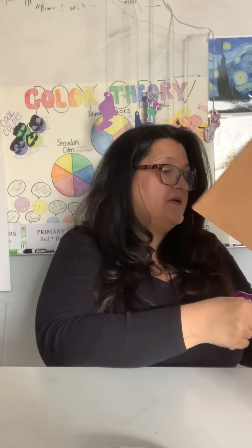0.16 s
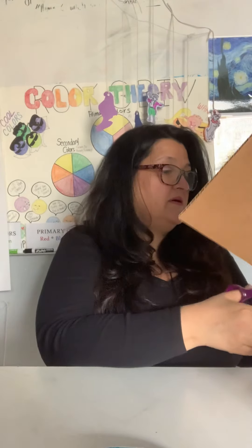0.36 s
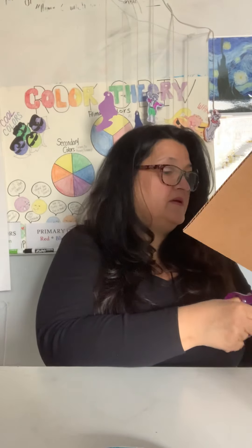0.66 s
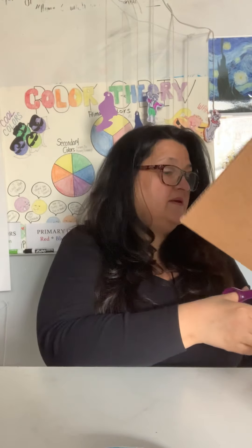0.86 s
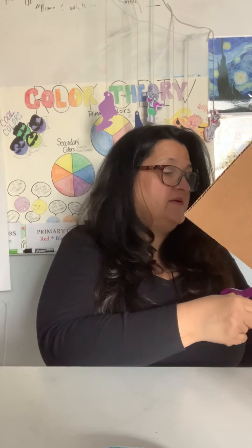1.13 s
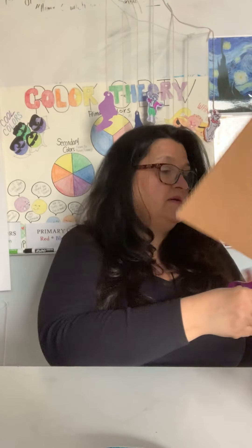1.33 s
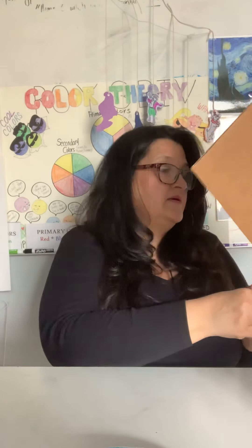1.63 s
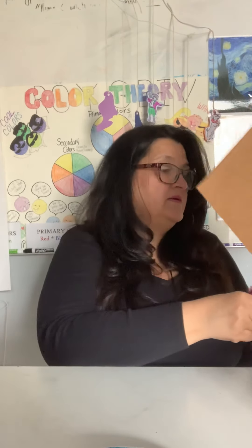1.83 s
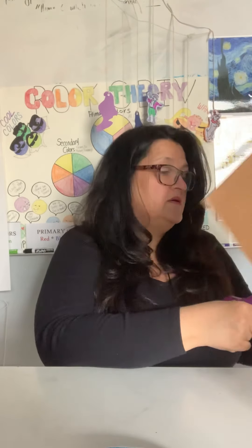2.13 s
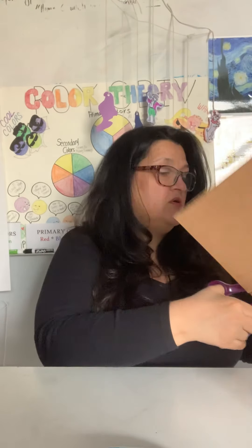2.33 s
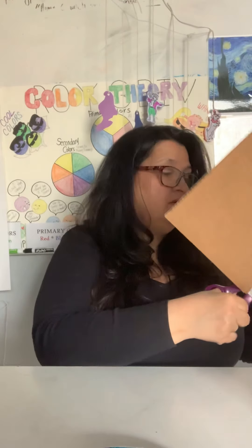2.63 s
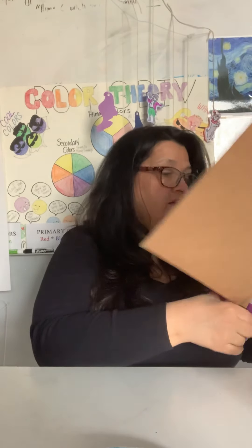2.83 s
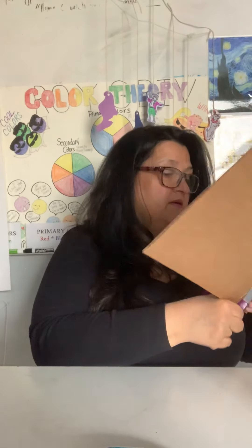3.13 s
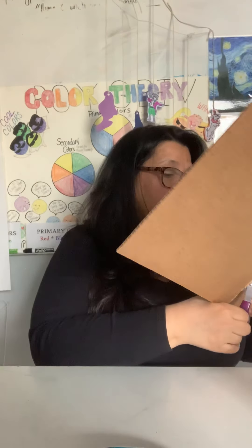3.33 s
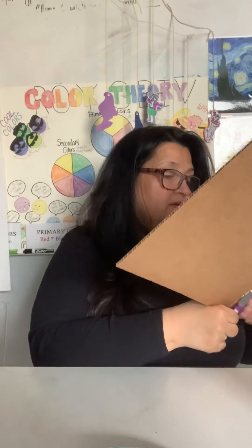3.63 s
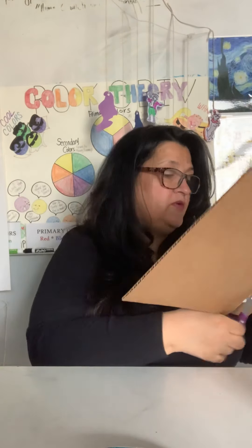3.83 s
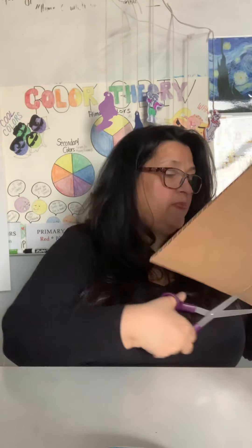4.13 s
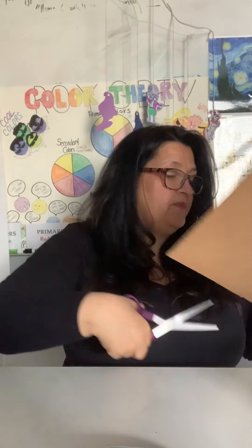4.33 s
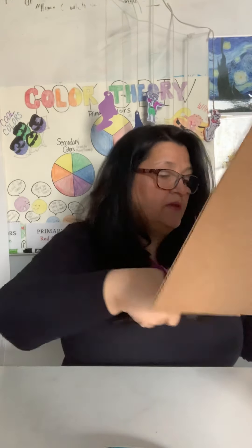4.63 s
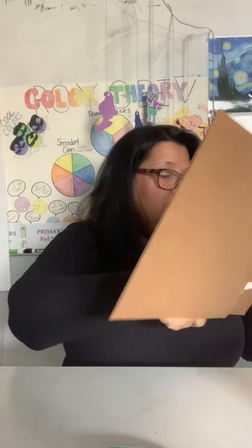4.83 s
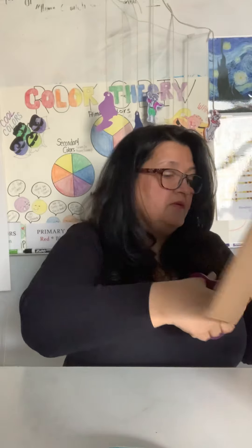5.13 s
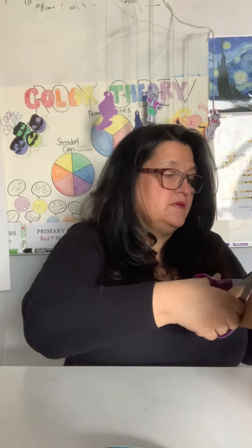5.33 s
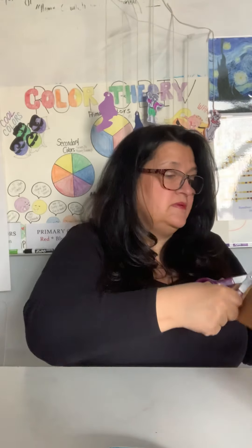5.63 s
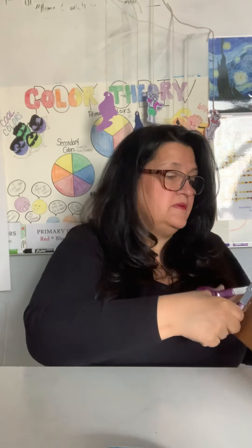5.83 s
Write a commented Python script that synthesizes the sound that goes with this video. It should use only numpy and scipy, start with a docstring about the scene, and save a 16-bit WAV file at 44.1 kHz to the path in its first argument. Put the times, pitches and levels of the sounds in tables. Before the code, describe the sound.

Scissors cut in irregular crunching snips through a stiff cardboard sheet that knocks and pops hollowly, close by in a small quiet room.

```python
"""Scissors through cardboard

Scissors cut a hand-held sheet of cardboard at a table, right of a stereo microphone in a small room.
Strokes are noise grains and fibre twangs, coloured into hiss, rasp and drumming; snaps are bursts of breaks.
The sheet knocks in decaying bending modes and pops in short sinking notes.
Behind them: a rumble as the sheet is moved, a faint gliding tone and quiet room air."""
import sys
import numpy as np
from scipy import signal
from scipy.fft import rfft, irfft, next_fast_len
from scipy.io import wavfile
from scipy.ndimage import uniform_filter1d, map_coordinates

SR = 44100
rng = np.random.default_rng(int(sys.argv[2]) if len(sys.argv) > 2 else 0)


def materialize(psi):
    """Save the field psi as 16-bit PCM at rate SR to the path in sys.argv[1].

    A 1-D psi becomes a single channel; in a 2-D psi each row is a channel.
    """
    bounded = np.clip(np.atleast_2d(psi).T, -1, 1)
    quanta = np.round(bounded * 32767).astype(np.int16)
    wavfile.write(sys.argv[1], SR, quanta)


N = 263894  # samples

# room air spectrum: freq_hz, level_db
AIR_SPECTRUM = [(25, -6.5), (60, 1), (130, -0.5), (200, -3), (300, -13.5), (600, -23), (1200, -29),
                (1700, -17), (4000, -34.5), (5400, -29), (11000, -33.5), (16000, -46.5)]
# rumble spectrum: freq_hz, level_db
RUMBLE_SPECTRUM = [(20, -4), (32, -9), (45, 0), (72, -3), (120, -4), (200, -13.5), (400, -45), (2000, -95)]
# rumble level as the sheet is moved about: time_s, level_db
SWAY_LEVEL = [(0, -63.5), (1.1, -62), (1.4, -68.5), (1.9, -65), (2.2, -63), (3.6, -64), (4.1, -59.5),
              (4.45, -79), (4.85, -62), (5.1, -97), (5.5, -103), (5.72, -62), (5.98, -80)]
# faint tone while the sheet is turned: time_s, pitch_hz, level_db
GLIDE = [(4.32, 245, -95), (4.37, 242, -64), (4.42, 248, -63), (4.46, 262, -69), (4.5, 275, -61),
         (4.56, 268, -69), (4.62, 268, -95)]
# decay of the room: freq_hz, t60_s
ROOM_T60 = [(150, 0.43), (400, 0.1), (1000, 0.14), (3000, 0.062), (7500, 0.2), (15000, 0.23)]
# likeness of the two microphone ports: freq_hz, coherence (0-1)
PORT_LIKENESS = [(60, .99), (300, .98), (600, .91), (1200, .8), (2200, .68), (4400, .9), (8500, .9),
                 (13000, .9)]
# lag of the left port behind the right: freq_hz, lag_s
PORT_LAG = [(200, .00009), (700, .00017), (1500, .00013), (4400, .000116), (13000, .000114)]

# bending modes of the sheet: pitch_hz, level_db, t60_s (before the ring factor)
SHEET_MODES = [(76, -6, 0.27), (195.5, -5, 0.3), (284, 5.5, 0.26), (360.5, -0.5, 0.21), (413.4, -0.5, 0.21),
               (508, -9.5, 0.15), (540.6, -4, 0.14), (606.5, 3.5, 0.09), (691, 3, 0.11), (749, -11, 0.24),
               (917, -7, 0.17), (1051, -1, 0.1), (1244, -3.5, 0.1), (1515, 1, 0.087), (1970, 1, 0.095),
               (2545, 0, 0.18)]
# decay of the finer sheet modes: freq_hz, t60_s
FINE_MODE_T60 = [(100, 0.19), (300, 0.19), (800, 0.081), (3000, 0.043)]
# mode families thump, boom, body, clack: low_hz, high_hz
MODE_FAMILIES = [(45, 240), (240, 470), (470, 1000), (1000, 3000)]
# gain of the fine modes, one per family: gain_db
FINE_GAIN_DB = [-1, -15, -8, 3.5]
# boom pitch set by the grip on the sheet: time_s, pitch_hz
GRIP_PITCH = [(0.1, 282), (1.0, 295), (1.6, 290), (3.0, 302), (3.5, 312), (4.2, 278.3), (4.48, 269),
              (4.66, 279.4), (5.6, 276.3)]
# buckling knocks: start_s, level_db, thump_db, boom_db, clack_db (all three re body), ring_factor
KNOCKS = [(0.006,-35,6.5,-2,-9,.8), (0.047,-36.5,1,-5,0.5,0.5), (0.076,-36,-5,2.5,-2,0.34),
          (0.139,-38,8,-1,-1,0.69), (0.538,-32,0,5,7.5,0.57), (0.565,-24,-3.5,1,-3.5,0.89),
          (0.594,-30.5,5,4,1.5,0.76), (1.002,-24,-6.5,-7,-1.5,0.67), (1.02,-28,3,-6.5,-1,0.99),
          (1.052,-30.5,-13.5,-14,4,1.3), (1.595,-16,-10.5,-1,-4,0.88), (1.686,-27,-6,-1.5,-3.5,0.93),
          (2.081,-31,-8,-26,-6,0.91), (2.278,-25.5,-3,-7.5,-2.5,1.45), (2.479,-28,-4.5,-10,-3.5,0.76),
          (2.572,-20,-7.5,-10,-3,0.98), (2.967,-20.5,-1.5,5,3.5,1.24), (3.02,-21,-12,-8,-11,1.2),
          (3.042,-23,-7,-1,-5.5,0.65), (3.265,-22.5,-14.5,-8,1.5,1.2), (3.422,-24,-6,11,1,0.7),
          (3.445,-24,-7,-6,-15,0.52), (3.533,-19.5,-13,2.5,-10,0.44), (3.737,-23,-22.5,-9.5,-10.5,1),
          (3.853,-29,-15,1.5,-3.5,.95), (4.195,-24.5,-9,0,3.5,0.92), (4.481,-58,4.5,2,4.5,1.2),
          (4.626,-23,-2,1,-4,1.1), (4.659,-27.5,-6,9.5,11,0.6), (4.766,-26.5,-3,1,-3.5,2.4),
          (4.871,-28.5,-10,2,2,2.3), (5.009,-31,-21,1.5,2.5,0.78), (5.048,-25.5,-29,-12,7,.55),
          (5.124,-22,-15.5,-5,3.5,0.97), (5.415,-34,-25,-8,-20,1.3), (5.485,-20.5,-20,0,-6,1.14),
          (5.552,-23,-14,5,-4,1.6), (5.569,-24.5,-11,2,-9,.8), (5.594,-16,-16,1,-3,0.78),
          (5.713,-30,6,9,-10,0.73), (5.78,-30,-2.5,-16,4,0.85)]
# patches popping through: start_s, pitch_hz (at onset), level_db, t60_s
POPS = [(0.006, 425, -25.5, 0.041), (0.047, 402, -22, 0.034), (0.044, 1070, -36, 0.046),
        (0.078, 183, -31, 0.11), (0.14, 640, -37.5, 0.064), (0.566, 539, -23, 0.063),
        (1.002, 1010, -27, 0.042), (1.256, 2010, -37, 0.065), (1.596, 615, -21.5, .08),
        (1.597, 441, -27.5, 0.17), (1.686, 686, -31, 0.053), (1.687, 2320, -36, .08),
        (2.479, 1200, -19.5, 0.017), (2.57, 890, -27.5, 0.034), (2.969, 1280, -21.5, 0.052),
        (3.02, 584, -19.5, 0.076), (3.043, 608, -21.5, 0.072), (3.045, 296, -23, 0.16),
        (3.266, 1250, -27.5, .03), (3.422, 601, -18.5, 0.094), (3.445, 1050, -28, .03),
        (3.533, 644, -15.5, 0.05), (3.534, 962, -22.5, 0.074), (3.739, 617, -29.5, 0.056),
        (3.995, 1010, -38, 0.028), (4.016, 392, -34, 0.058), (4.229, 980, -31, .06),
        (4.626, 400, -27.5, 0.084), (4.659, 1470, -27, .04), (4.66, 615, -31, .09),
        (5.009, 1363, -25, 0.037), (5.4815, 1476, -20.5, 0.032), (5.552, 767, -19, 0.037),
        (5.554, 361, -22, 0.12), (5.588, 1490, -15.5, 0.03), (5.592, 685, -14.5, .045),
        (5.603, 279, -18, 0.16), (5.492, 285, -23.5, 0.17), (5.126, 292, -29.5, 0.094)]

# board giving way: start_s, level_db, decay_s (60 dB, floored at 2 ms), woody_db (middle of the crack)
SNAPS = [(0.004, -25, 0.023, -5), (0.045, -21, 0.02, -5), (0.0768, -20.5, 0.018, -4),
         (0.102, -27, .007, -9), (0.115, -24, 0.0091, -20), (0.1387, -9, 0.0047, -9.5),
         (0.2726, -24.5, 0.0077, 3), (0.528, -21, 0.0077, 4), (0.5367, -15.5, 0.022, 2),
         (0.5414, -16.5, .022, 1), (0.5654, -12.5, 0.015, -8), (0.5924, -15.5, 0.021, -13),
         (0.7445, -24.5, 0.01, -2), (0.7805, -5.5, .0012, -5.5), (0.788, -12.5, 0.0028, 1),
         (0.961, -24.5, 0.017, -2), (1.0022, -15, .018, 2.5), (1.018, -18, 0.018, -9),
         (1.052, -20.5, 0.028, 4), (1.5926, -21, 0.0071, 2), (1.5948, -14, .013, 3),
         (1.683, -26.5, 0.026, 5), (1.691, -28.5, .015, -12), (1.743, -39.5, 0.0099, -4),
         (1.9068, -61.5, .011, -6.5), (2.143, -32.5, 0.0099, 1), (2.4224, -36.5, 0.0078, 12),
         (2.479, -29, .0059, 9), (2.54, -15.5, 0.0092, 3), (2.5698, -14, 0.012, 1),
         (2.577, -25.5, 0.045, 1), (2.822, -22, 0.0042, -7), (2.907, -31, 0.0078, 2),
         (2.9667, -16, 0.011, -2), (2.9705, -13.5, 0.01, 5), (2.975, -17, .023, 5), (3.0173, -20, 0.011, 0),
         (3.1785, -34, .005, -9), (3.266, -23, 0.0095, 12), (3.4207, -14, 0.0073, 7),
         (3.533, -27.5, .012, 9), (3.7378, -47, .008, 0), (3.773, -23.5, 0.01, 8),
         (4.1949, -14.5, 0.0078, -5), (4.228, -15.5, 0.0082, -2), (4.446, -50, 0.042, 6),
         (4.501, -47, 0.035, 0.5), (4.6237, -27.5, 0.015, 2.5), (4.632, -25, 0.0054, -2),
         (4.6588, -5, 0.0059, -3), (4.743, -22, 0.0037, -3), (4.82, -36, 0.0037, -1),
         (5.0472, 0.5, 0.0035, -0.5), (5.07, -14, 0.011, -6), (5.1224, -8, 0.0024, 9),
         (5.2842, -32.5, 0.0039, -12), (5.411, -25.5, 0.0087, -5), (5.4148, -18, .0024, -9),
         (5.43, -20, 0.0045, -10), (5.445, -26, 0.0036, -15), (5.459, -29, .003, -10),
         (5.4816, -7, 0.01, -8), (5.4865, -14, .018, -19), (5.501, -26, 0.035, -5),
         (5.551, -20, 0.0059, -3), (5.571, -19, 0.016, -12), (5.588, -15.5, 0.013, 12),
         (5.5915, -7, 0.021, 4.5), (5.866, -18, 0.0043, -5)]
# crack spectrum: freq_hz, level_db
CRACK_SPECTRUM = [(150, -20.5), (700, -8.5), (1300, -13.5), (2200, -13), (3300, 1), (4400, -23.5),
                  (5500, 2.5), (6700, 2), (9500, 1), (11000, 0.5), (13500, -10.5), (16000, -2)]
# resonance of the strip between the blades: time_s, pitch_hz
STRIP_PITCH = [(0.14, 9700), (0.59, 9300), (0.78, 8100), (1.0, 9100), (2.55, 7800), (2.97, 8500),
               (4.66, 7320), (5.05, 8820), (5.48, 7200), (5.59, 6570)]
# rate of small snaps within strokes: time_s, ticks_per_s
TICK_RATE = [(0, 70), (1.0, 55), (1.3, 10), (2.2, 20), (2.5, 55), (3.4, 40), (3.7, 4), (4.4, 4), (4.8, 25),
             (5.4, 70), (5.9, 15)]
# pushes of the blades or slides of the board: start_s, length_s, level_db (hiss at the end of the push),
# swell_db (rise on the way), rasp_db, drum_db (both re hiss)
STROKES = [(0.003, 0.11, -45.5, -4.5, -8, -6.5), (0.202, 0.022, -41, -2.5, -1.5, -4.5),
           (0.275, 0.052, -37.5, 10, -1.5, -3), (0.474, 0.0073, -48.5, -2, -14, -12),
           (0.502, 0.03, -31.5, 11, -9, -8.5), (0.54, 0.048, -44, -1, 0, 7.5),
           (0.742, 0.043, -35, 12, -5, -3.5), (0.851, 0.1, -46.5, 11, -12, -7),
           (0.96, 0.085, -40, -1, -8, -6.5), (1.117, 0.036, -39.5, 5, -6.5, -7.5),
           (1.24, 0.013, -43, 1, -2, -5.5), (1.578, 0.02, -42.5, 5, -1.5, -12),
           (1.6, 0.091, -46.5, -4.5, -12, 1), (1.93, 0.07, -73, 3.5, 6, 3.5),
           (2.07, 0.072, -42, 1.5, -2, -6), (2.188, 0.11, -32.5, 14.5, -4.5, -5),
           (2.443, 0.044, -38.5, 3.5, -0.5, -9.5), (2.511, 0.055, -32.5, 0, -7, -4),
           (2.773, .06, -35.5, 5.5, -4, -3.5), (2.906, 0.09, -29.5, 15, -5.5, -1),
           (2.979, 0.053, -35, -7.5, -4.5, -4.5), (3.18, 0.1, -41, 3.5, 0, -0.5),
           (3.357, 0.085, -35, 3.5, -3.5, 0.5), (3.527, 0.088, -53, 0, 2.5, 6.5),
           (3.624, 0.072, -39, 11.5, -5.5, -11.5), (3.752, 0.14, -38, 4, -3, -2.5),
           (3.9, .11, -35, 5, -8.5, -5.5), (4.038, 0.057, -49, -4, 2.5, 4),
           (4.14, 0.042, -44.5, 12, -1.5, -5), (4.196, 0.025, -38.5, 12.5, 3, 4.5),
           (4.446, 0.2, -67, 2.5, 7.5, -6), (4.632, 0.03, -33.5, 2, -4.5, -7.5),
           (4.729, 0.076, -35.5, 10.5, -3, 1.5), (4.86, 0.058, -35, -1.5, -3.5, -3),
           (5.01, 0.074, -39, 4.5, 3, -5.5), (5.131, 0.079, -39, 3.5, -6, -4),
           (5.38, 0.011, -50.5, 1, -10, -6.5), (5.412, 0.028, -36.5, 5.5, -11, -1.5),
           (5.488, 0.025, -35, -2, -7, -1), (5.568, 0.044, -35, 1, -2.5, -2.5),
           (5.715, 0.024, -47.5, -7.5, -0.5, -2.5), (5.781, 0.073, -45.5, -11.5, -1.5, -4),
           (5.902, 0.02, -65.5, -6, 2.5, 9)]
# hiss spectrum of the fibres: freq_hz, level_db
FIBRE_SPECTRUM = [(2000, -26), (3000, -12), (3700, -9), (4600, -8), (5400, -4), (6600, -1.2), (7600, -.3),
                  (9000, -.5), (10200, -.3), (11400, -2), (12600, -9), (14000, -10), (15700, -10.5)]
# rasp spectrum: freq_hz, level_db
RASP_SPECTRUM = [(500, -24), (950, 0), (1250, -0.5), (1520, 1), (1740, -1), (2020, 6.5), (2400, -1.5),
                 (2750, 3.5), (3600, -14), (5500, -38), (9000, -21.5)]
# drumming spectrum: freq_hz, level_db
DRUM_SPECTRUM = [(30, -24.5), (70, -0.5), (130, -2.5), (200, 2.5), (235, -9.5), (280, 1), (370, 3),
                 (490, 1.5), (620, 0.5), (850, -11), (1300, -7.5), (2500, -33)]
# level of the top treble: time_s, gain_db
TREBLE_GAIN = [(0.2, 1), (3.7, 1), (4.1, -5), (4.65, -6), (5.1, -0.5), (5.5, -1)]

ATTACK_DB_PER_S = 1797.5  # bite of the blades
HISS_FALL_DB_PER_S, RASP_FALL_DB_PER_S, DRUM_FALL_DB_PER_S = 288, 283.5, 236  # after the push
TEARS_PER_S, TEAR_HZ, TEAR_RANGE_OCTAVES, TEAR_CYCLES = 900, 1690, 1.18, 7  # range is +/-, 60 dB per life
TICK_DB, TICK_SPREAD_DB, TICK_S = 8, 2, .003  # small snaps: level over the hiss, scatter, decay
BREAKS_PER_S, MAIN_BREAK_S = 14000, .0014  # main break energy re the other breaks: MAIN_BREAK_S / decay_s
STRIP_DB, STRIP_WIDTH_HZ, WOODY_BELOW_HZ = 3.5, 800, 4300
BOOM_MODE = 2  # row of SHEET_MODES tuned by the grip
HELD_RING = .35  # ring time factor while the blades grip the sheet
POP_SAG, POP_SETTLE_S = .06, 0.011  # share by which the pitch sinks, time constant
POP_SWELL_CYCLES, SHEET_SWELL_CYCLES = 0.68, 0.88  # build-up time constants
TREBLE_EDGE_HZ, TOP_HZ = 9000, 15800
CEILING = .72  # full scale = 1
LN_60_DB = np.log(1000)
TIME_S = np.arange(N) / SR


def amp(db):
    """Decibels to gain."""
    return 10 ** (np.asarray(db) / 20)


def unit(x):
    """Scale to rms 1."""
    return x / np.sqrt(np.mean(x ** 2) + 1e-20)


def along(points, hz):
    """Read (Hz, value) points on a log frequency axis."""
    f, v = np.transpose(points)
    return np.interp(np.log(hz + 1), np.log(f + 1), v)


def over_time(points):
    """Read (s, value) points at every sample."""
    return np.interp(TIME_S, *np.transpose(points))


def wobble(knots_per_s):
    """Smooth random curve through normally distributed knots."""
    knots = rng.standard_normal(int(N * knots_per_s / SR) + 4)
    return map_coordinates(knots, [np.arange(N) * knots_per_s / SR])


def filtered(x, response):
    """Multiply the spectrum of x by a complex response of frequency."""
    n = x.shape[-1]
    m = next_fast_len(n + 8192)
    return irfft(rfft(x, m) * response(np.fft.rfftfreq(m, 1 / SR)), m)[..., :n]


def coloured(x, spectrum, size=4096):
    """Minimum-phase filter of unit energy with this spectrum."""
    gain = amp(along(spectrum, np.fft.rfftfreq(size, 1 / SR)))
    # folding the cepstrum makes the filter causal
    cepstrum = irfft(np.log(gain))
    cepstrum[1:size // 2] *= 2
    cepstrum[size // 2 + 1:] = 0
    kernel = irfft(np.exp(rfft(cepstrum)))
    return signal.fftconvolve(x, kernel / np.linalg.norm(kernel))[:len(x)]


def patchy(x, patchy_db, size):
    """Resonances that drift at random, as in a strip that keeps changing shape; rms 1."""
    z = signal.stft(x, nperseg=size)[2]
    field = uniform_filter1d(rng.standard_normal(z.shape), size=2, axis=0)
    field = uniform_filter1d(field, size=9, axis=1)
    return unit(signal.istft(z * amp(patchy_db * unit(field)), nperseg=size)[1][:N])


def dying(t60, size=256):
    """Half a second of noise, each frequency decaying at its own rate."""
    hz, t, z = signal.stft(rng.standard_normal(SR // 2), SR, nperseg=size)
    decay = amp(-60 * t / along(t60, hz)[:, None])
    return signal.istft(z * decay, SR, nperseg=size)[1][:SR // 2]


def add(track, start_s, sound):
    """Mix a sound into the track in place."""
    part = track[max(round(start_s * SR), 0):][:len(sound)]
    part += sound[:len(part)]


def in_room(x, wet_db):
    """Direct sound, then after a short gap the answer of the walls as decaying noise."""
    tail = np.pad(dying(ROOM_T60), (round(0.0037 * SR), 0))
    response = amp(wet_db) * tail / np.linalg.norm(tail)
    response[0] = 1
    return signal.fftconvolve(x, response)


def room_air():
    """Quiet room air: coloured noise of slowly wandering level."""
    noise = coloured(rng.standard_normal(N), AIR_SPECTRUM)
    return amp(-65.0 + 1.2 * wobble(7)) * patchy(noise, patchy_db=3.0, size=1024)


def sway():
    """Low rumble as the sheet is moved about: noise following a level curve."""
    level_db = over_time(SWAY_LEVEL) + 1.2 * wobble(11)
    return amp(level_db) * unit(coloured(rng.standard_normal(N), RUMBLE_SPECTRUM))


def glide():
    """Faint, slightly unsteady sine in the pause while the sheet is turned."""
    time_s, pitch_hz, level_db = np.transpose(GLIDE)
    pitch = np.interp(TIME_S, time_s, pitch_hz) * (1 + .015 * wobble(60))
    gate = (TIME_S > time_s[0]) * (TIME_S < time_s[-1])
    gain = amp(np.interp(TIME_S, time_s, level_db)) * gate
    return gain * np.sin(2 * np.pi * np.cumsum(pitch) / SR)


def knocks():
    """Families of bending modes build up, lowest last, and ring out over a thud of finer modes."""
    track, t = np.zeros(N), np.arange(SR // 2) / SR
    hz, level_db, t60_s = np.transpose(SHEET_MODES)
    for start_s, knock_db, thump_db, boom_db, clack_db, ring_factor in KNOCKS:
        flex, strength = rng.standard_normal((2, len(hz)))
        pitch = hz * (1 + .016 * flex)
        pitch[BOOM_MODE] = np.interp(start_s, *np.transpose(GRIP_PITCH))
        fade = np.exp(-LN_60_DB * t / (t60_s[:, None] * np.clip(ring_factor, .3, 2)))
        gain = amp(level_db + 2 * strength)[:, None]
        swings = gain * np.sin(2 * np.pi * pitch[:, None] * t) * fade
        thud, blow = dying(FINE_MODE_T60), np.zeros(len(t))
        families_db = [thump_db, boom_db, 0, clack_db]
        for k, ((low_hz, high_hz), family_db) in enumerate(zip(MODE_FAMILIES, families_db)):
            ring = unit(swings[(hz >= low_hz) & (hz < high_hz)].sum(0))
            band = signal.butter(3, [low_hz, high_hz], "band", fs=SR, output="sos")
            fine = unit(signal.sosfilt(band, thud))
            swell = 1 - np.exp(-t * np.sqrt(low_hz * high_hz) / SHEET_SWELL_CYCLES)
            # alternate polarity between families
            family = swell * ((-1) ** k * ring + amp(FINE_GAIN_DB[k]) * fine)
            blow += amp(family_db) * family / np.linalg.norm(family)
        add(track, start_s, amp(knock_db + 16.5) * in_room(blow, wet_db=-10.0))
    return track


def pops():
    """A buckling patch gives a short hollow note that sinks as the patch relaxes."""
    track, t = np.zeros(N), np.arange(SR // 5) / SR
    # integral of the pitch drop
    sunk_s = POP_SAG * (t - POP_SETTLE_S * (1 - np.exp(-t / POP_SETTLE_S)))
    for start_s, hz, level_db, t60_s in POPS:
        swell = 1 - np.exp(-t * hz / POP_SWELL_CYCLES)
        note = swell * np.exp(-LN_60_DB * t / t60_s) * np.sin(2 * np.pi * hz * (t - sunk_s))
        add(track, start_s, amp(level_db) * in_room(note, wet_db=-12))
    return track


def small_snaps():
    """Single fibres tick at random along a stroke, at most eight; rows like SNAPS."""
    rows = []
    for start_s, length_s, level_db, swell_db, *_ in STROKES:
        rate = np.interp(start_s, *np.transpose(TICK_RATE))
        draws = zip(rng.random(size=8), rng.random(size=8), rng.standard_normal(size=8))
        for chance, way, strength in draws:
            if chance < rate * length_s / 8:
                hiss_db = level_db - swell_db * (1 - way)
                tick_db = hiss_db + TICK_DB + TICK_SPREAD_DB * strength
                rows.append((start_s + way * length_s, tick_db, TICK_S, 0))
    return rows


def crack_spectrum(time_s, woody_db):
    """Crack spectrum plus woody middle and resonance of the bent strip, as (Hz, dB)."""
    hz = np.geomspace(100, SR / 2, 200)
    centre_hz = np.interp(time_s, *np.transpose(STRIP_PITCH))
    woody = woody_db / (1 + (hz / WOODY_BELOW_HZ) ** 6)
    strip = STRIP_DB / (1 + ((hz - centre_hz) / STRIP_WIDTH_HZ) ** 2)
    return np.transpose([hz, along(CRACK_SPECTRUM, hz) + woody + strip])


def snaps():
    """A main break, then a dying trail of smaller breaks; short snaps are more main break."""
    lead_s = .008
    track, t = np.zeros(N), np.arange(SR // 16) / SR - lead_s
    for start_s, level_db, decay_s, woody_db in SNAPS + small_snaps():
        decay_s = max(decay_s, .002)
        avalanche = np.exp(np.minimum(t / 0.0002, -LN_60_DB * t / decay_s))
        # weak soft skirt on both sides of the main break
        envelope = avalanche + amp(-19.5) * np.exp(-abs(t) / 0.002)
        breaks = envelope * rng.choice([-1, 1], len(t)) * (rng.random(len(t)) < BREAKS_PER_S / SR)
        burst = breaks / (np.linalg.norm(breaks) + 1e-9)
        burst[round(lead_s * SR)] = np.sqrt(MAIN_BREAK_S / decay_s)
        burst = burst * np.linalg.norm(envelope) / np.linalg.norm(burst)
        crack = coloured(burst, crack_spectrum(start_s, woody_db), size=1024)
        # main break falls 1.2 ms after start_s
        add(track, start_s + .0012 - lead_s, amp(level_db - 1.5) * in_room(crack, wet_db=-10.5))
    return track


def grains(rate_per_s, spread_db, smooth):
    """Fibre breaks of uneven size as random pulses over a smooth noise rub, rms 1."""
    sizes = amp(spread_db * np.minimum(rng.exponential(size=N), 2.5))
    breaks = (rng.random(N) < rate_per_s / SR) * sizes * rng.choice([-1, 1], N)
    return unit(unit(breaks) + smooth * rng.standard_normal(N))


def tears():
    """Each torn fibre twangs briefly as a decaying sine at its own pitch, rms 1."""
    count = int(TEARS_PER_S * N / SR)
    when, pitch, size = rng.random((count, 3)).T
    hz = TEAR_HZ * 2 ** (TEAR_RANGE_OCTAVES * (2 * pitch[:, None] - 1))
    cycles = hz * np.arange(SR // 150) / SR
    gain = amp(8 * size[:, None]) * np.sqrt(hz)
    twangs = gain * np.sin(2 * np.pi * cycles) * amp(-60 * cycles / TEAR_CYCLES)
    at = (when[:, None] * N).astype(int) + np.arange(cycles.shape[1])
    return unit(np.bincount(at.ravel(), twangs.ravel(), N)[:N])


def stroke_level(against_db, fall_db_per_s):
    """Gain over time: each stroke bites fast, swells or sags during the push, then dies away."""
    power = np.zeros(N)
    for (start_s, length_s, end_db, swell_db, *_), colour_db in zip(STROKES, against_db):
        end_s = start_s + length_s
        attack = ATTACK_DB_PER_S * np.maximum(start_s - TIME_S, 0)
        push = swell_db * np.clip((end_s - TIME_S) / max(length_s, .005), 0, 1)
        release = fall_db_per_s * np.maximum(TIME_S - end_s, 0)
        level = end_db + colour_db - attack - push - release
        heard = level > -110
        power[heard] = np.maximum(power[heard], amp(level[heard]) ** 2)
    return np.sqrt(power)


def through_sheet(x):
    """Steady tugging excites the sheet's bending modes, as a sum of damped resonances."""
    def response(f):
        total = 0
        for hz, level_db, t60_s in SHEET_MODES:
            width_hz = LN_60_DB / np.pi / (t60_s * HELD_RING)
            resonance = 1j * f * np.sqrt(width_hz * hz) / (hz * hz - f * f + 1j * f * width_hz)
            total = total + amp(level_db) * resonance
        return total
    return filtered(x, response)


def strokes():
    """Blades stick and slip through fibres, which hiss, rasp and set the sheet drumming."""
    *_, rasp_db, drum_db = np.transpose(STROKES)
    slip = wobble(130)
    # whole bundles of fibres ripping at once
    rips = grains(rate_per_s=130, spread_db=2, smooth=0)
    tearing = unit(grains(rate_per_s=1100, spread_db=-1.5, smooth=1.0) * amp(1.2 * slip)) + 0.32 * rips
    scraping = unit(tears() * amp(1.0 * slip)) + 0.5 * rng.standard_normal(N) + .25 * rips
    tugging = grains(rate_per_s=310, spread_db=2.5, smooth=0.81) * amp(0.52 * slip)
    hiss = patchy(coloured(tearing, FIBRE_SPECTRUM), patchy_db=2.2, size=256)
    hiss = hiss * stroke_level(np.zeros(len(STROKES)), HISS_FALL_DB_PER_S)
    rasp = patchy(coloured(scraping, RASP_SPECTRUM), patchy_db=3, size=512)
    rasp = rasp * stroke_level(rasp_db, RASP_FALL_DB_PER_S)
    drum = patchy(coloured(tugging, DRUM_SPECTRUM), patchy_db=4.5, size=1024)
    drum = drum * stroke_level(drum_db, DRUM_FALL_DB_PER_S)
    ringing = unit(through_sheet(drum)) * np.std(drum)
    return amp(-2.0) * hiss + amp(-2.5) * rasp + amp(-10.5) * drum + amp(-5.5) * ringing


def treble_shift(x):
    """The treble above the edge rises and falls in level over time."""
    treble = filtered(x, lambda hz: 1 - 1 / (1 + (hz / TREBLE_EDGE_HZ) ** 24))
    return x + treble * (amp(over_time(TREBLE_GAIN)) - 1)


def ports(x):
    """Sound from the right reaches the left port later; reflections differ between the ports."""
    walls = dying([(1000, .22)])
    scattered = signal.fftconvolve(x, walls / np.linalg.norm(walls))[:N]

    def turn(hz):
        return np.arccos(np.clip(along(PORT_LIKENESS, hz), -1, 1)) / 2

    def delay(hz):
        # half the lag on each side: left late, right early
        return np.exp(1j * np.pi * hz * along(PORT_LAG, hz) * np.array([[-1], [1]]))

    shared = filtered(x, lambda hz: np.cos(turn(hz)))
    apart = filtered(scattered, lambda hz: np.sin(turn(hz)))
    return filtered(np.array([shared + apart, shared - apart]), delay)


def scene():
    """Cutting over glide, air and sway, heard at two ports."""
    background = room_air() + sway() + glide()
    cutting = treble_shift(knocks() + pops() + snaps() + strokes())
    balance_db = [[-.15], [.15]]  # left, right
    return ports(background + cutting) * amp(balance_db)


def record(dry):
    """Round off the loudest peaks, then cut steeply above the band limit."""
    rounded = dry / (1 + abs(dry / CEILING) ** 6) ** (1 / 6)
    return filtered(rounded, lambda hz: 1 / (1 + (hz / TOP_HZ) ** 120))


dry = scene()
out = record(dry)
materialize(out)
```